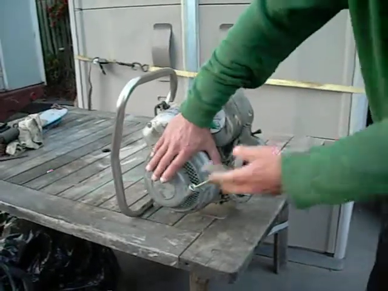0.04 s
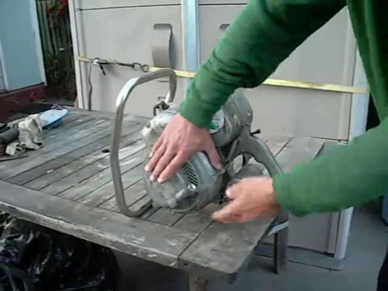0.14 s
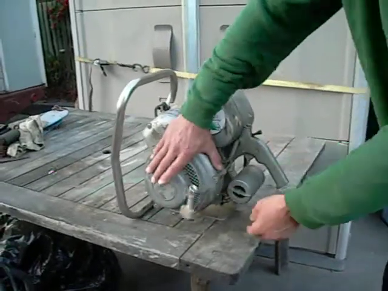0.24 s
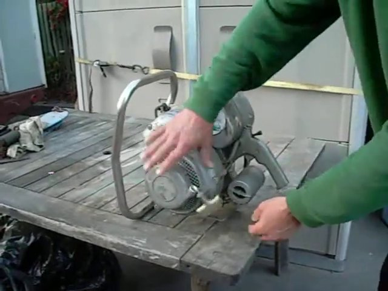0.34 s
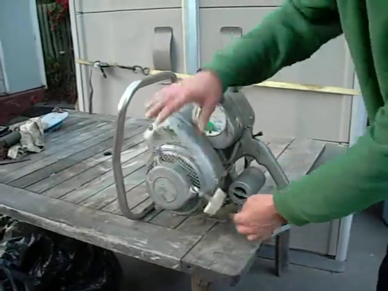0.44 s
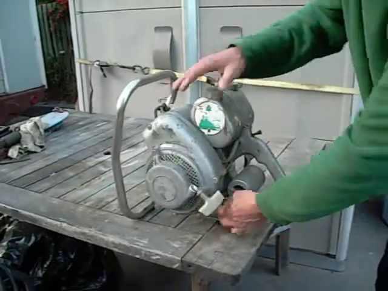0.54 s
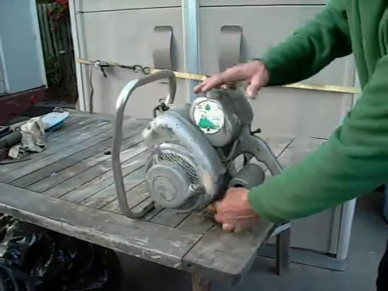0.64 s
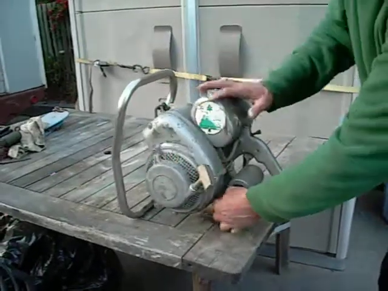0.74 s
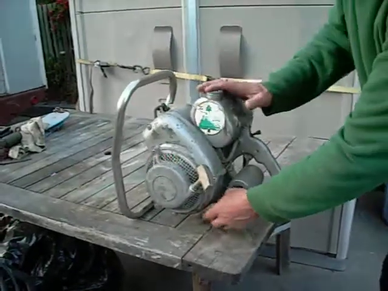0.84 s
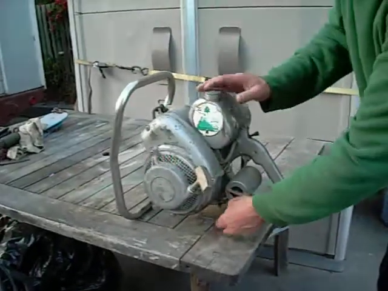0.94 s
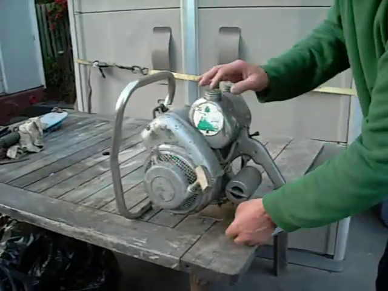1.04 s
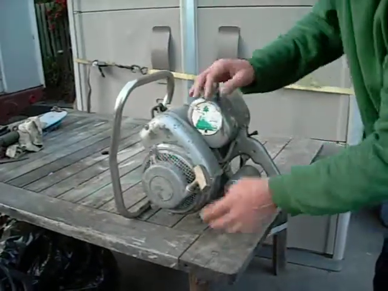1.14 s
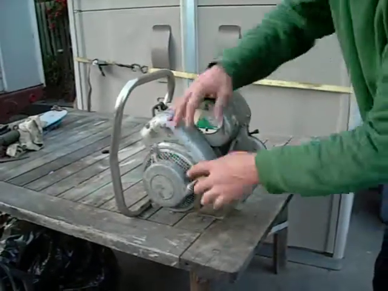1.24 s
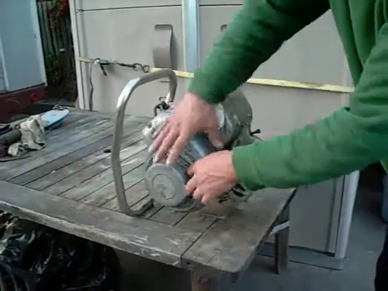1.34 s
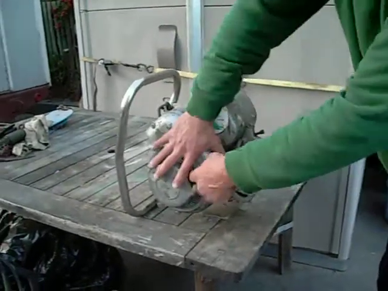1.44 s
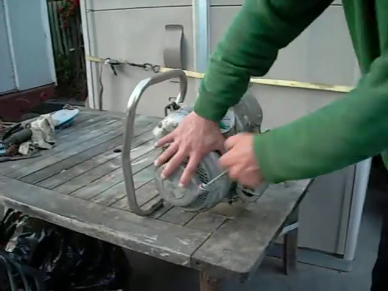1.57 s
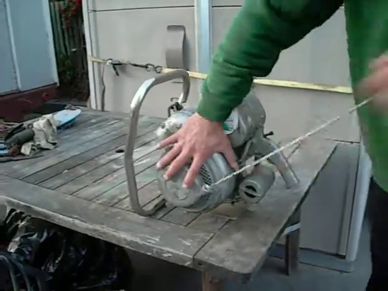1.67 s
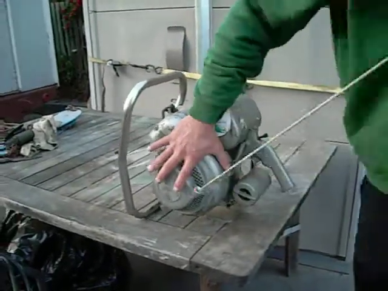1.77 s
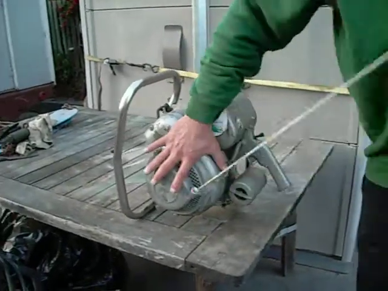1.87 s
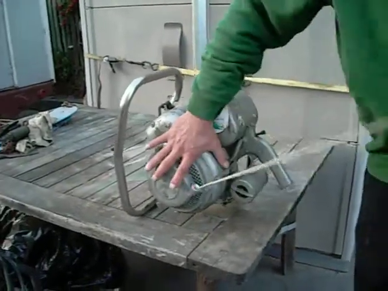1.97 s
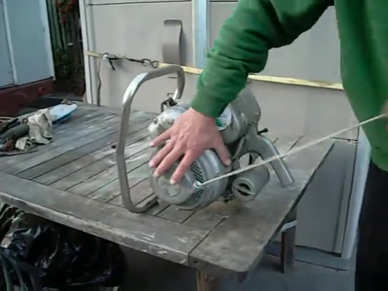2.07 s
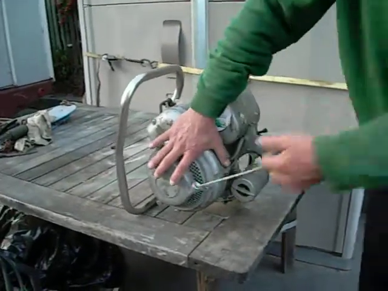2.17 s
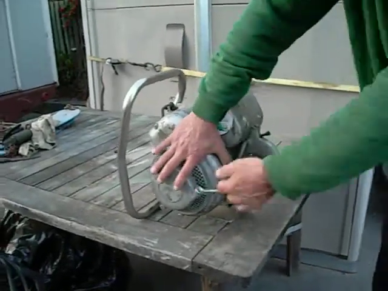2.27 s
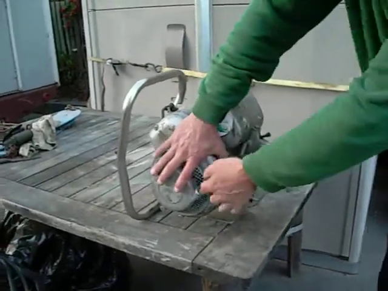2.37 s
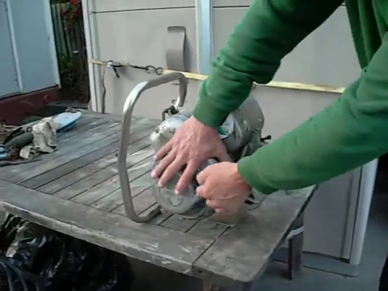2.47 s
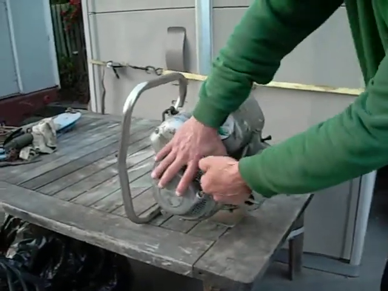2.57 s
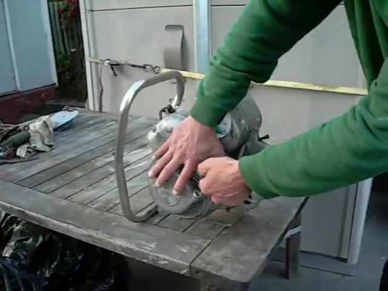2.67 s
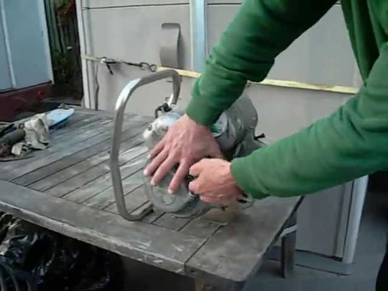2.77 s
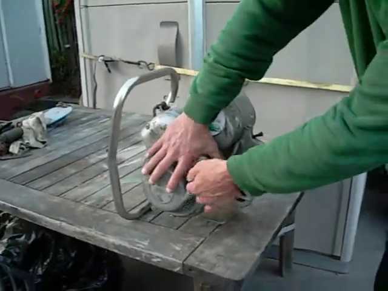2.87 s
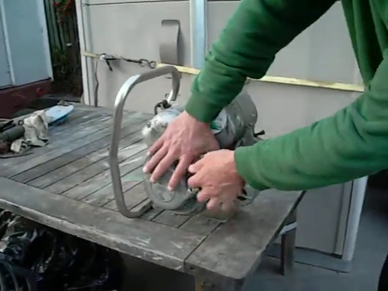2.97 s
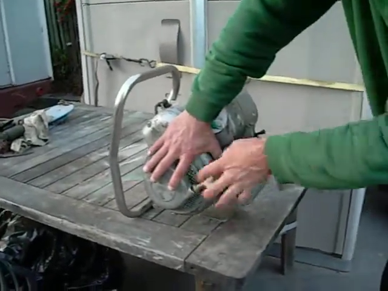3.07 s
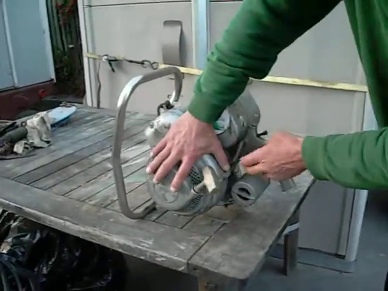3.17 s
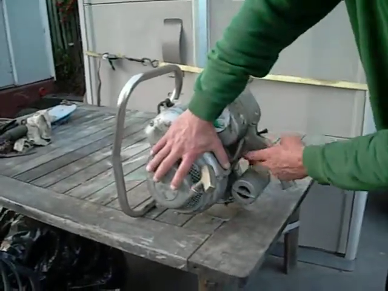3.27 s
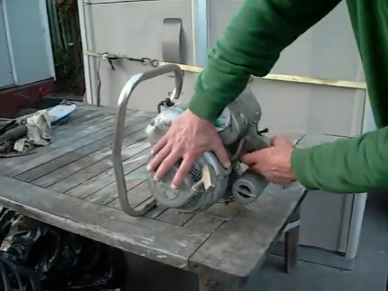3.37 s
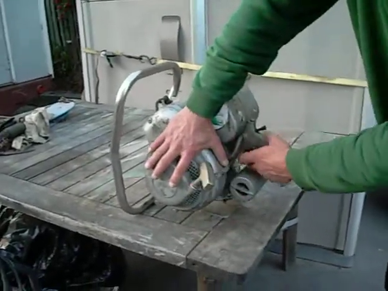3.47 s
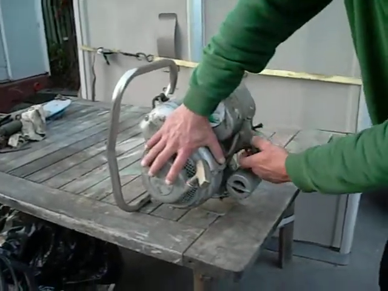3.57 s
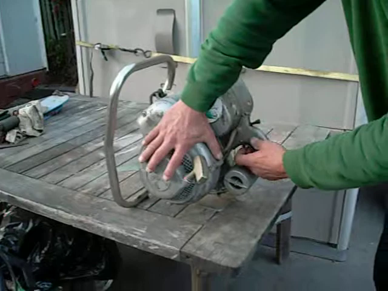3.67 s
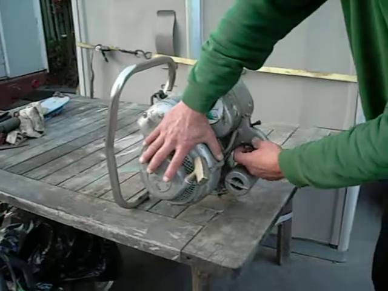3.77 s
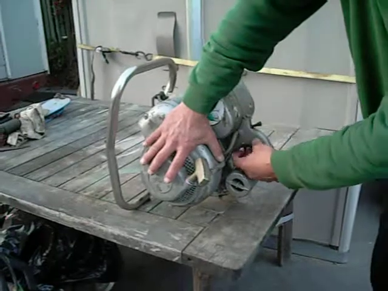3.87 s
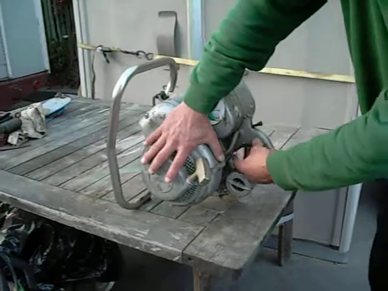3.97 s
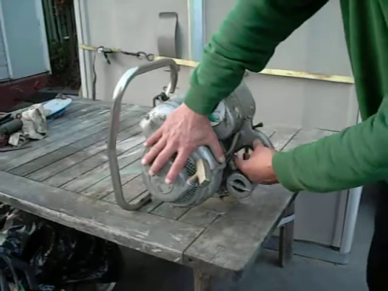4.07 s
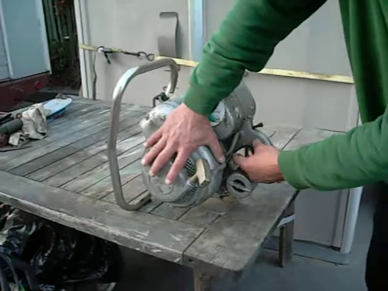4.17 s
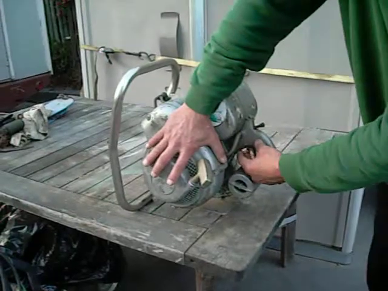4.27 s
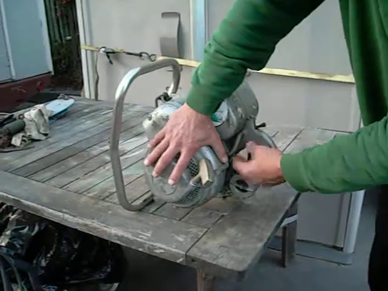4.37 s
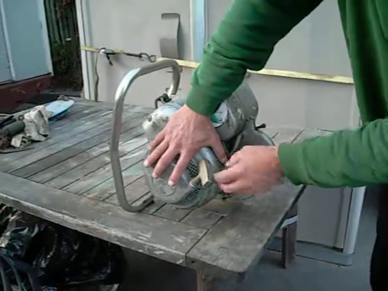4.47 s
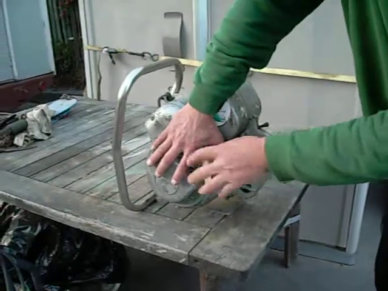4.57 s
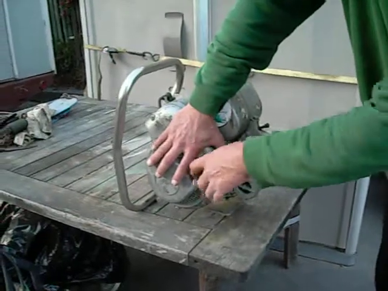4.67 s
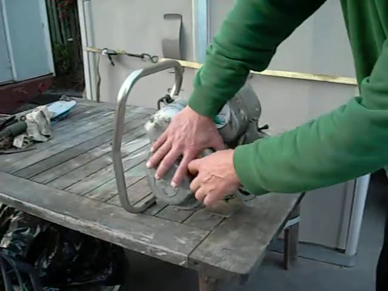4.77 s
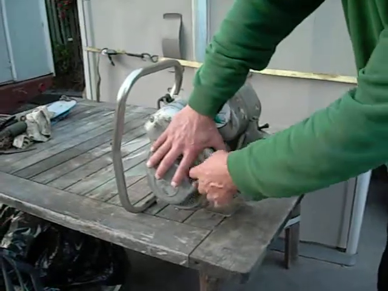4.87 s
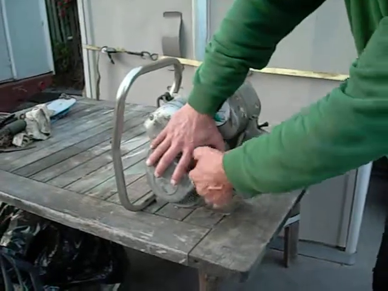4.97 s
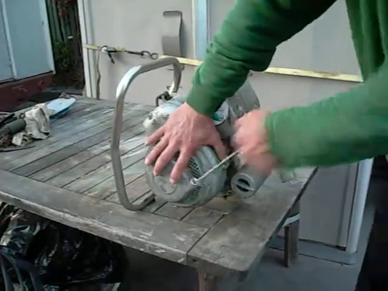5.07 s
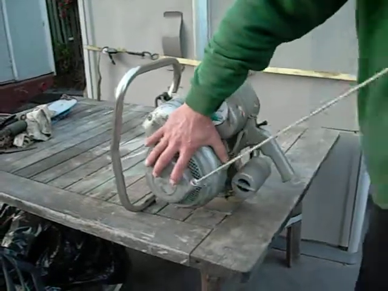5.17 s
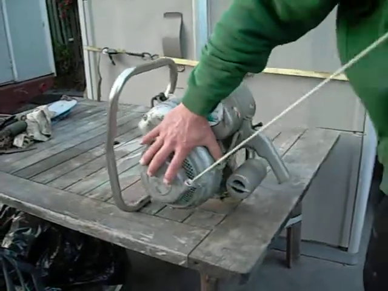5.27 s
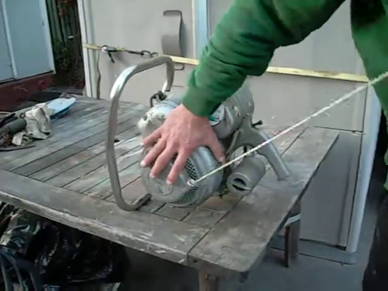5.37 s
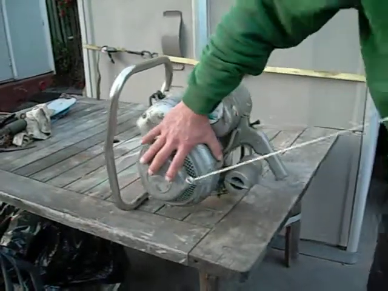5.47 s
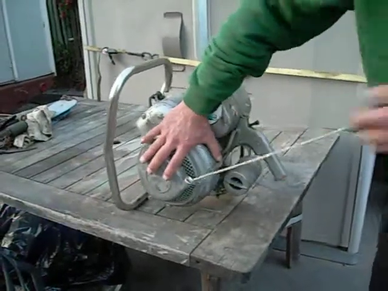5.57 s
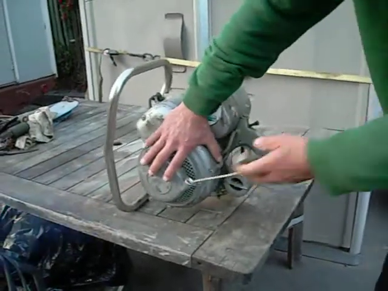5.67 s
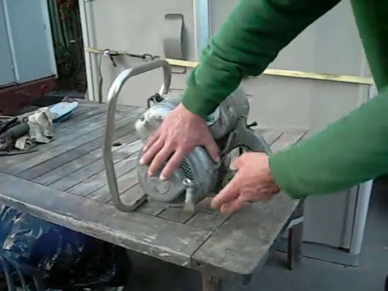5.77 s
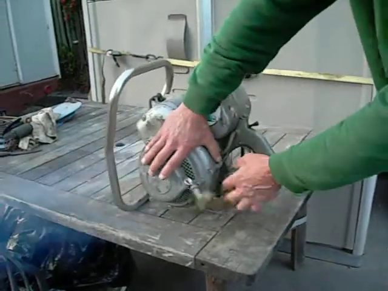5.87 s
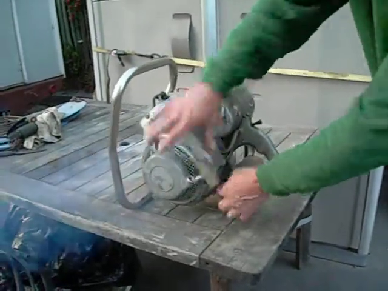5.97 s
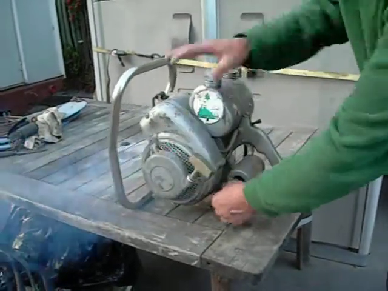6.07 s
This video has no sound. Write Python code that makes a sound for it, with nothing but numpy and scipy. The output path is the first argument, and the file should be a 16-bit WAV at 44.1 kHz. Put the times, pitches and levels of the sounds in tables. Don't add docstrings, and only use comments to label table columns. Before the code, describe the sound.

Close, distorted engine strokes slow to silence with a ringing flywheel; starter clatter, a failed pull, small clicks, then the motor fires, races and floods.

```python
import sys
import numpy as np
from scipy import signal
from scipy.fft import rfft, irfft
from scipy.io import wavfile
from scipy.ndimage import uniform_filter1d

SR = 44100
rng = np.random.default_rng(int(sys.argv[2]) if len(sys.argv) > 2 else 0)


def int16_out(signal):
    q = np.round(np.clip(np.atleast_2d(signal).T, -1, 1) * 32767)
    wavfile.write(sys.argv[1], SR, q.astype(np.int16))


def attenuation_scalar(level_db):
    decades = np.asarray(level_db, float) / 20
    return 10 ** decades


N = 269892
TIME = np.arange(N) / SR

# pitch in Hz, level in dB per Hz.
YARD_AIR = [(88, -28.5), (150, -13), (430, -11), (883, -2), (1300, -5.5), (3500, -14.5), (4000, -2.5),
            (5200, -64.5)]
# middle in seconds, length in seconds, extra level in dB.
GRIPS = [(.8, 0.09, 11), (1.4, .2, 7.7), (2.55, 0.22, 2.3), (3.24, 0.11, 9), (3.9, 0.089, 1.4),
         (4.85, .2, 4.4)]
# time in seconds, pitch in Hz, level in dB.
HIGH_NEIGHBOUR = [(.72, 3493, -33), (.9, 3484, -37), (.988, 3482, -31), (1.04, 3480, -37),
                  (1.286, 3494, -27), (1.442, 3505, -28), (1.58, 3502, -37)]
# pitch in Hz, sinking in Hz per second, time to fade 60 dB in seconds.
HIGH_TONE = (3567, 18, .6)
LOW_TONE = (1637, 27, 1.2)
# start in seconds, high tone level in dB, low tone level in dB.
BRUSHES = [(.76, -18.5, -33.5), (0.879, -54.5, -35), (.95, -36, -36.5), (1.069, -40, -52),
           (1.12, -40.5, -36), (1.36, -21.5, -55), (1.456, -57, -44)]
# start in seconds, pitch in Hz, level in dB, time to fade 60 dB in seconds.
STRUCK_RINGS = [(.64, 1787, -12, .85), (.75, 1582, -33, 3), (.74, 3440, -28, .6), (2.26, 1545, -23, .6),
                (2.26, 1615, -28, 5), (2.26, 1787, -39, 2.5), (2.26, 3499, -29, .9), (2.26, 3548, -32, 1.1),
                (3.295, 1830, -24, .15), (3.295, 3590, -22, .15), (3.295, 2950, -22, .12),
                (3.505, 3630, -21, .5), (3.505, 3710, -24, .4), (3.5, 1120, -20, .3), (3.5, 1800, -24, .25),
                (3.5, 2900, -20, .22), (4.112, 3590, -21, .16), (4.112, 2918, -19, .1),
                (4.112, 1109, -24, .1), (5.022, 1615, -22, .55), (5.022, 1787, -22, .55)]
# start in seconds, peak in dB, pitch in Hz, thud level in dB.
KNOCKS = [(0.635, 10.5, 2230, -10), (.676, 15.5, 2700, -2), (.7701, -32, 3740, -33),
          (1.6023, 5.5, 2870, -18), (1.6175, 3.5, 2500, -23), (2.2048, 2.5, 3020, -18),
          (2.226, 4, 3900, -9.5), (2.2538, 3.5, 3250, -7), (2.3069, -15, 2500, -16),
          (3.2918, -7, 3300, -40), (3.2955, -3.5, 2100, -22), (3.477, -16.5, 2820, -29),
          (3.485, -11, 3220, -33.5), (3.492, 11.5, 3890, -25), (3.5036, 11.5, 3510, -29),
          (4.108, -1, 3080, -29), (4.1131, -2.5, 3360, -21), (5.0094, -18, 1810, 1), (5.023, 1, 1690, -7),
          (5.0775, -7, 2900, -16), (5.096, 4, 2570, -7.5), (5.114, 2.5, 2490, -15)]
# start in seconds, peak in dB, pitch in Hz.
TICKS = [(1.414, -17, 2680), (1.4822, -15, 2970), (1.5302, -20.5, 2420), (2.4277, -16.5, 3000),
         (2.4496, -23, 3320), (2.4601, -11, 3600), (2.482, -10.5, 3630), (2.6092, -16.5, 3440),
         (2.6783, -11, 3700), (2.732, -18, 2920), (2.9697, -16, 3030), (3.0163, -27, 2110),
         (3.1, -21, 2250), (3.1186, -12.5, 3460), (3.1545, -19, 2970), (3.1683, -12.5, 3500),
         (3.192, -17, 2420), (4.1983, -14, 2920), (4.4628, -14.5, 2800), (4.7835, -22.5, 2050),
         (4.816, -21.5, 1820), (4.857, -11.5, 3700), (4.9779, -18, 2050)]
# start in seconds, peak in dB, pitch in Hz.
TAPS = [(2.307, -6.5, 703), (2.698, -10.5, 570), (3.257, -12, 510), (3.689, -16, 778), (3.846, -13, 570),
        (3.885, -26, 990)]
# start in seconds, peak in dB.
PAWL_TICKS = [(.77, -12.5), (.8033, -15.5), (.8627, -17), (.8861, -23), (.905, -19), (.943, -17.5),
              (0.9978, -20), (1.0672, -17.5), (1.1101, -16), (1.1666, -23), (1.176, -20), (1.261, -22),
              (1.3376, -24), (1.3633, -17)]
# pitch in Hz, level in dB, time to fade 60 dB in seconds.
PAWL_SPRING = [(3700, -8, 0.16), (3700, -4, 0.053), (3800, -22, 0.056)]
# pitch in Hz, width in Hz, level in dB.
CASING = [(1205, 1130, -5), (1943, 310, -3), (2474, 284, -1.5), (3296, 470, -7), (3837, 510, -1.5)]
# time in seconds, level in dB.
SPINS = [
    [(0, -9.5), (.508, -13), (.522, -14), (.545, -8.5), (.58, -12.5), (.62, -20.5), (.662, -26),
     (.684, -2.5), (.705, -29.5)],
    [(.705, -27.5), (.88, -43)],
    [(1.601, -15), (1.639, -13.5), (1.801, -9), (1.859, -5), (1.879, -16), (2.015, -10.5), (2.201, -13),
     (2.255, -24.5), (2.3, -31.5)],
    [(5.074, -18), (5.1, -14), (5.12, -15.5), (5.204, -6), (5.378, -7.5), (5.6, -6), (5.8, -3),
     (6.12, -5.5)],
]
# cover at start and end in dB, starter cup at start and end in dB.
SPIN_RINGS = [
    (-2.5, -11.5, -9, -2),
    (4.5, 1, -19, -10.5),
    (-7, -12.5, -4.5, -5.5),
    (-10.5, -9, -9, -2.5),
]
# start in seconds, peak in dB.
PULLED = [(1.627, -7.5), (1.699, -10.5), (1.743, -1), (1.799, -16.5), (1.854, -5), (1.916, -21),
          (1.959, -15), (2.043, -29.5), (2.066, -17.5), (2.187, -24), (5.097, -23), (5.153, -12),
          (5.201, -7), (5.261, -6), (5.306, -5.5), (5.352, -9.5)]
# start in seconds, peak in dB.
CAUGHT = [(5.369, 3.2), (5.389, -14), (5.415, 1.5), (5.437, -4.5), (5.451, -4), (5.465, 1), (5.49, -0.5)]
# pitch in Hz, level in dB, time to fade 60 dB in seconds.
MUFFLER = [(300, -7, .03), (420, -11, .03), (588, 0, .09), (878, -3.5, .09), (1050, -10, .05)]
# time in seconds, shaft turns a second.
REVS = [(5.5, 52.2), (5.55, 64.5), (5.67, 84.6), (5.718, 92.1), (5.802, 99.7), (5.848, 102.7),
        (5.954, 107.1), (6.12, 109.5)]
# time in seconds, firing level in dB.
FIRING = [(5.5, 4), (5.6, 7.5), (5.7, 10.5), (5.79, 9.5), (5.805, -12), (6.12, -12)]
TURNS_APART = [2, 2.5, 3]
BANGS_EACH = [5, 4, 4]
# start in seconds, peak in dB.
GUSTS = [(5.511, -2), (5.616, 8.5), (5.657, 6), (5.714, 1.5), (5.724, 2.2), (5.736, 9), (5.85, 2),
         (5.904, 1.5), (5.931, 7.5), (5.952, 4.5), (5.968, -2.5), (5.998, 7), (6.025, -0.5), (6.079, 0.5),
         (6.11, 0)]


def unit(x):
    return x / np.sqrt(np.mean(x ** 2))


def band(x, hz, width):
    return signal.lfilter(*signal.iirpeak(min(hz, 9000), max(hz / width, .3), SR), x)


def curve(rows):
    s, *columns = np.transpose(rows)
    on = uniform_filter1d(1. * ((TIME >= s[0]) & (TIME <= s[-1])), size=300)
    return [np.interp(TIME, s, c) for c in columns] + [on]


def walk(rate):
    k = int(SR / rate)
    held = np.repeat(rng.standard_normal(N // k + 1), k)
    return 1.64 * uniform_filter1d(uniform_filter1d(held, k), k)[:N]


def add(out, s, sound):
    i = int(s * SR)
    out[i:i + len(sound)] += sound[:max(N - i, 0)]


def fade(t, t60):
    return np.exp(-np.log(1000) * t / t60)


def yard():
    yard_db, wind_db, hand_db = -39.5, -46.5, -48.5
    hz, db = np.transpose(YARD_AIR)
    f = np.fft.rfftfreq(N, 1 / SR)
    air = irfft(rfft(rng.standard_normal(N)) * attenuation_scalar(np.interp(np.log(f + 1), np.log(hz), db)), N)
    swell = walk(2.0)
    traffic = np.zeros(N)
    for centre in 150 * 2 ** np.arange(0, 5, .7):
        traffic += attenuation_scalar(0.16 * swell + 2.6 * walk(6.1)) * band(air, centre, centre / 2)
    wind = band(rng.standard_normal(N), 40, 72) * attenuation_scalar(0.79 * walk(7.6))
    table = band(rng.standard_normal(N), 630, 470) * attenuation_scalar(1.2 * walk(16))
    grip_db = sum(db * np.exp(-((TIME - s) / length) ** 2) for s, length, db in GRIPS)
    hiss = attenuation_scalar(yard_db + 0.33 * grip_db) * unit(traffic)
    rumble = attenuation_scalar(wind_db + 0.35 * grip_db) * unit(wind)
    return hiss + rumble + attenuation_scalar(hand_db + grip_db) * unit(table)


def singing():
    slowing_s, attack_s = .72, 0.011
    rub_s, rub_db, rise_db_s, fall_db_s = 1.273, -12, 113, 155
    since = TIME - slowing_s
    high, low = np.zeros((2, N))
    attack = np.minimum(TIME / attack_s, 1)
    for s, high_db, low_db in BRUSHES:
        add(high, s, attenuation_scalar(high_db) * fade(TIME, HIGH_TONE[2]) * attack)
        add(low, s, attenuation_scalar(low_db) * fade(TIME, LOW_TONE[2]) * attack)
    high += attenuation_scalar(rub_db + np.minimum(rise_db_s * (TIME - rub_s), fall_db_s * (rub_s - TIME)))
    pair_hz, pair_db, on = curve(HIGH_NEIGHBOUR)
    tones = [(high, HIGH_TONE[0] - HIGH_TONE[1] * since),
             (low, LOW_TONE[0] - LOW_TONE[1] * since),
             (attenuation_scalar(pair_db), pair_hz)]
    return on * np.sqrt(2) * sum(size * np.sin(2 * np.pi * np.cumsum(hz) / SR) for size, hz in tones)


def flywheel():
    out = singing()
    for s, hz, db, t60 in STRUCK_RINGS:
        beat = .6 + .8 * walk(160) if t60 <= .5 else 1
        add(out, s, attenuation_scalar(db) * beat * fade(TIME, t60) * np.sin(2 * np.pi * hz * TIME))
    return out


def knocks():
    out, t = np.zeros(N), TIME[:9000]
    shape = (fade(t, 0.065) + attenuation_scalar(6.5) * fade(t, 0.011)) * np.minimum(t / 0.00072, 1)
    for s, db, hz, thud_db in KNOCKS:
        burst = rng.standard_normal(len(t)) * shape
        bright = attenuation_scalar(-1.5) * band(burst, hz, 590) + attenuation_scalar(-2.5) * band(burst, 3360, 2700)
        thud = attenuation_scalar(thud_db + 4.5) * band(burst, 860, 440)
        add(out, s, attenuation_scalar(db) * (bright + thud))
    return out


def ticks_and_taps():
    pawl_hz, t60_s = 2380, .077
    out, t = np.zeros(N), TIME[:9000]
    for s, db, hz in TICKS + [(s, db, pawl_hz) for s, db in PAWL_TICKS]:
        burst = rng.standard_normal(len(t)) * fade(t, t60_s) * np.minimum(t / 0.0015, 1)
        add(out, s, attenuation_scalar(db) * (attenuation_scalar(-2.5) * band(burst, hz, 260) + attenuation_scalar(-3.0) * band(burst, 3100, 2200)))
    for s, db, hz in TAPS:
        add(out, s, attenuation_scalar(db) * band(rng.standard_normal(len(t)) * fade(t, t60_s), hz, 330))
    spring = sum(attenuation_scalar(db) * fade(t, t60) * np.sin(2 * np.pi * hz * t) for hz, db, t60 in PAWL_SPRING)
    for s, db in PAWL_TICKS:
        add(out, s, attenuation_scalar(db) * spring * walk(430)[:len(t)])
    return out


def puffs():
    first_s, turns_hz, drag = .017, 31.5, 35
    k = np.arange(13)
    s = first_s + (turns_hz - np.sqrt(turns_hz ** 2 - 2 * drag * k)) / drag
    puff_db = 3.5 - 0.96 * k + 2.5 * (k % 2)
    coast = list(zip(s, puff_db, -5 - 0.22 * k))
    pulled = [(s, db, db - 2) for s, db in PULLED]
    caught = [(s, db, db - 14.5) for s, db in CAUGHT]
    return coast + pulled + caught


def clatter():
    lead_s, hold_s, slack_db = .025, .05, -11
    knee_db, over_db = -17, 6
    scatter = np.repeat(rng.exponential(size=N // 40 + 1), 40)[:N]
    clicks = rng.standard_normal(N) * attenuation_scalar(3.5 * scatter)
    broad = np.zeros(N)
    for hz, width, db in CASING:
        broad += attenuation_scalar(4.75 * walk(20)) * attenuation_scalar(db) * band(clicks, hz, width)
    broad = unit(broad)
    broad += attenuation_scalar(-12) * unit(band(clicks, 780, 490) * attenuation_scalar(0.62 * walk(32)))
    cover = unit(band(clicks, 1594, 130) * attenuation_scalar(2.2 * walk(25)))
    cup = unit(band(clicks, 2886, 240) * attenuation_scalar(2.2 * walk(25)))

    stroke = sum(np.abs(TIME - s + lead_s - hold_s / 2) < hold_s / 2 for s, *_ in puffs())
    slack = 1 - uniform_filter1d(np.minimum(stroke, 1.), size=250)
    slack *= np.interp(TIME, [.4, 1.6, 5.3, 5.4], [1, .85, .7, 0])
    out = np.zeros(N)
    for rows, rings in zip(SPINS, SPIN_RINGS):
        db, on = curve(rows)
        ends_s = [rows[0][0], rows[-1][0]]
        cover_db = np.interp(TIME, ends_s, rings[:2])
        cup_db = np.interp(TIME, ends_s, rings[2:])
        hard = np.clip((db - knee_db) / 5, 0, 1)
        size = on * attenuation_scalar(db + 6.0 + hard * (over_db + slack_db * slack))
        out += size * (broad + attenuation_scalar(cover_db - 5.0) * cover + attenuation_scalar(cup_db - 2.5) * cup)
    return out


def muffler_ring(t, shut_s, pitch):
    ring = sum(attenuation_scalar(db) * fade(t, t60) * np.sin(2 * np.pi * hz * pitch * t) for hz, db, t60 in MUFFLER)
    return ring * np.exp(-(t / shut_s) ** 4)


def running():
    fired, bangs = np.zeros((2, N))
    turn_mark_s, flood_s, bang_db = 5.872, 5.811, 12
    hz, on = curve(REVS)
    phase = np.cumsum(hz * on) / SR
    turns = np.flatnonzero(np.diff(np.floor(phase - phase[int(turn_mark_s * SR)])))
    fired[turns] = attenuation_scalar(curve(FIRING)[0][turns] + 0.87 * rng.standard_normal(len(turns)))
    later = np.ceil(np.cumsum([0, *np.repeat(TURNS_APART, BANGS_EACH)])).astype(int)
    first = np.argmin(np.abs(turns / SR - flood_s))
    bangs[turns[first + later]] = attenuation_scalar(bang_db)
    return fired, bangs


def exhaust():
    puff_db, gas_db, gas_s = 6, -12, 0.023
    pulses, pumps, gusts = np.zeros((3, N))
    for s, db, case_db in puffs():
        add(pulses, s, attenuation_scalar(np.array([db + puff_db])))
        add(pumps, s, attenuation_scalar(np.array([puff_db + case_db - 0.5])))
    fired, bangs = running()
    t = TIME[:2000]
    thump = fade(t, 0.055) * np.sin(2 * np.pi * (270 - 1500 * t) * t) * np.minimum(t / .002, 1)
    pairs = [(pulses, muffler_ring(t, .013, 1.025)),
             (fired, muffler_ring(t, .0075, 1.04)),
             (bangs, muffler_ring(t, .013, 1.005)),
             (pumps, thump)]
    strokes = sum(signal.fftconvolve(hits, ring)[:N] for hits, ring in pairs)
    strokes = signal.lfilter(*signal.butter(3, 150, "high", fs=SR), strokes)
    gas = signal.fftconvolve(pulses + fired + bangs, np.exp(-t / gas_s))[:N]
    gas *= unit(band(rng.standard_normal(N), 680, 830))
    for s, db in GUSTS:
        add(gusts, s, attenuation_scalar(db + 4.0) * t / 0.001 * (1 - t / 0.0065) * np.exp(-t / 0.0037))
    return attenuation_scalar(6.5) * strokes + attenuation_scalar(gas_db) * gas + gusts


def scene():
    background = yard() + flywheel()
    saw = knocks() + ticks_and_taps() + clatter() + exhaust()
    t = TIME[:14000]
    echo = unit(rng.standard_normal(len(t)) * fade(t, .32)) / np.sqrt(len(t))
    wet = attenuation_scalar(-19) * signal.fftconvolve(saw, echo)[:N]
    return (background + saw + wet)[None]


def roll_off(x):
    return signal.sosfilt(signal.butter(12, 16620, fs=SR, output="sos"), x)


def record(dry):
    slow = signal.resample_poly(dry, 80, 441, axis=1)
    slow = np.clip(slow, -.68, .68)
    smooth = signal.firwin(numtaps=18 * 441 + 1, cutoff=3900, window=("kaiser", 4.6), fs=80 * SR)
    held = signal.resample_poly(slow, 441, 80, axis=1, window=smooth)
    mix = np.clip(held[:, :N], -.72, .72)
    return roll_off(mix)


dry = scene()
out = record(dry)
int16_out(out)
```